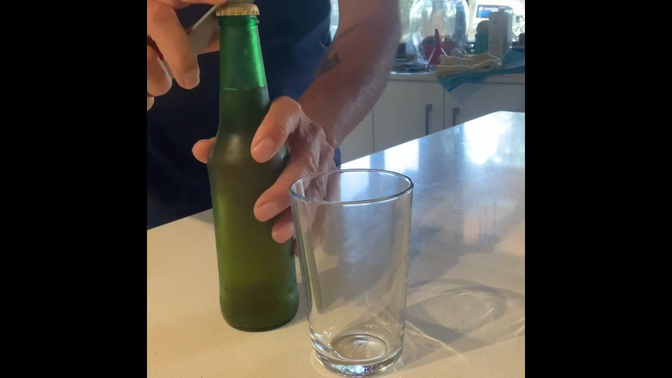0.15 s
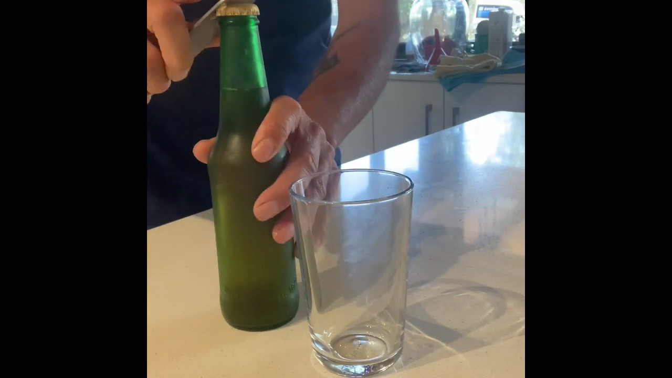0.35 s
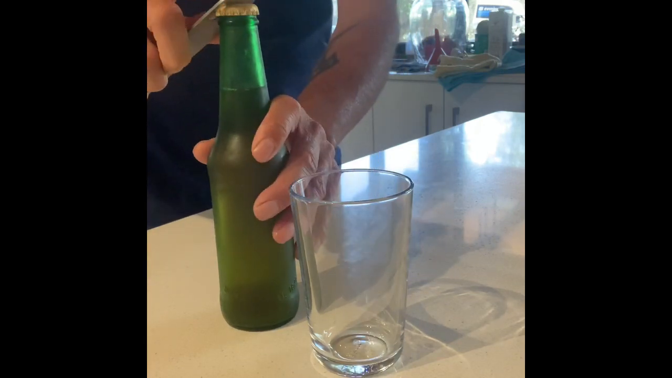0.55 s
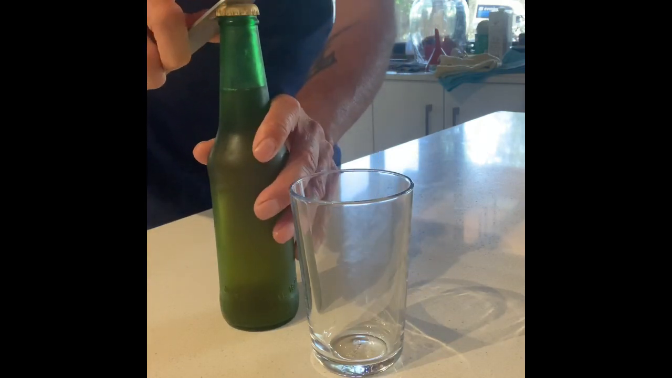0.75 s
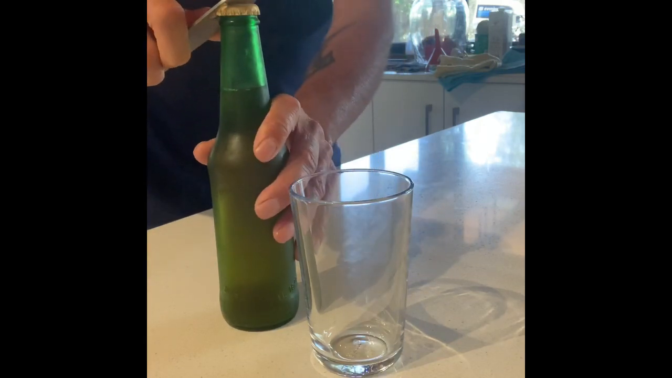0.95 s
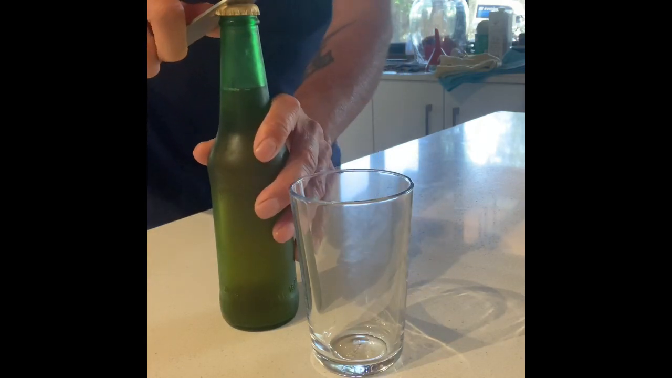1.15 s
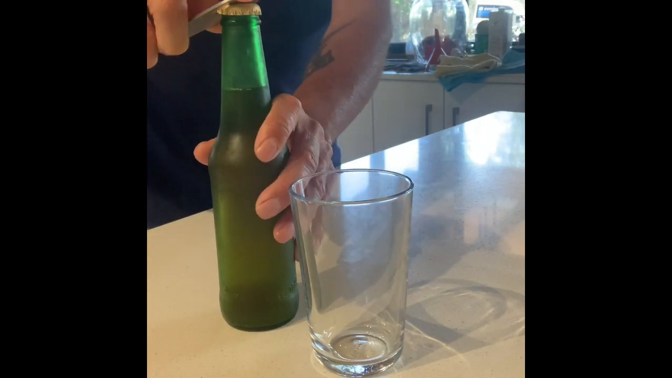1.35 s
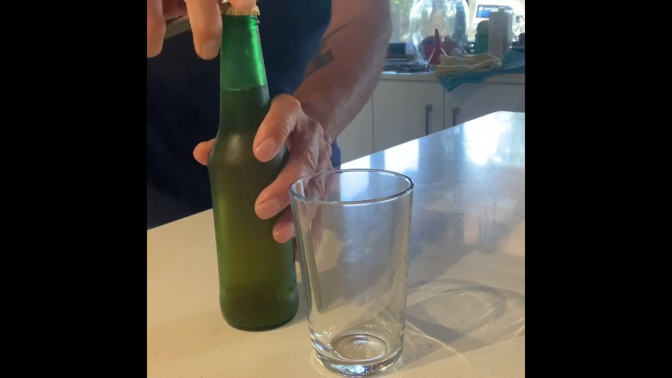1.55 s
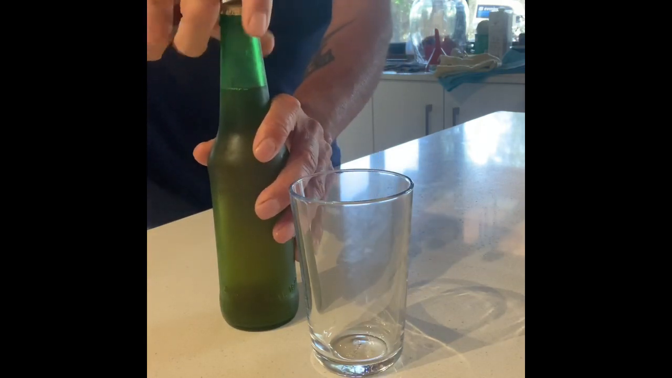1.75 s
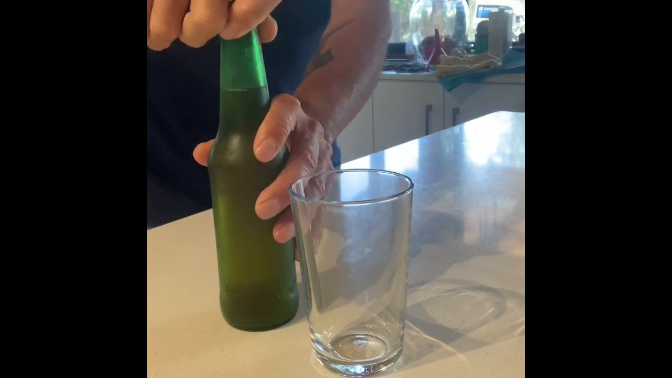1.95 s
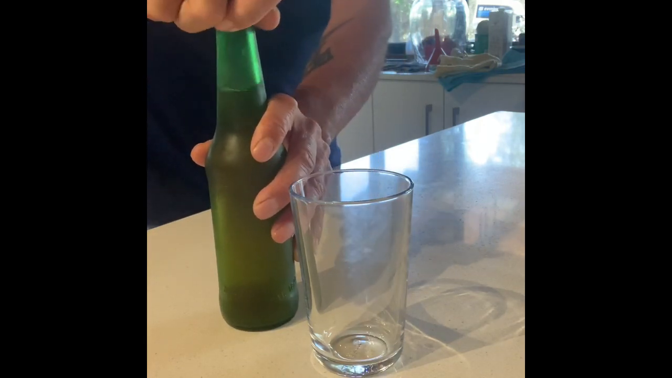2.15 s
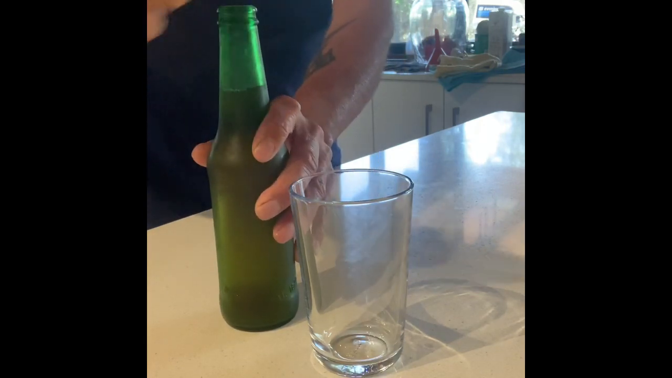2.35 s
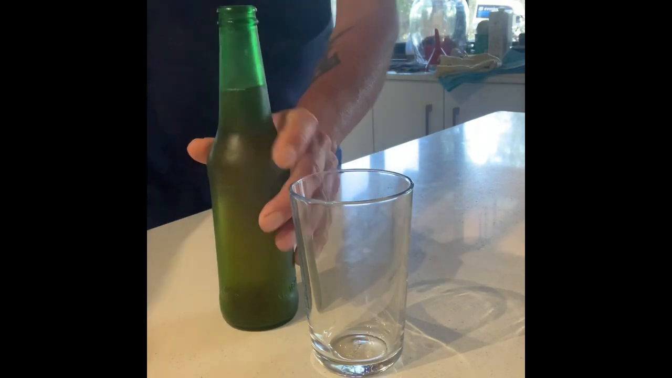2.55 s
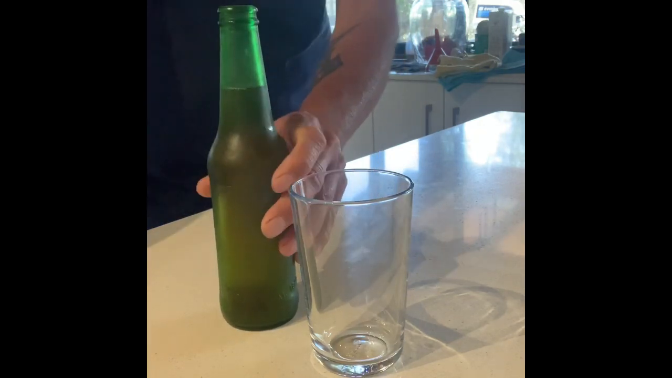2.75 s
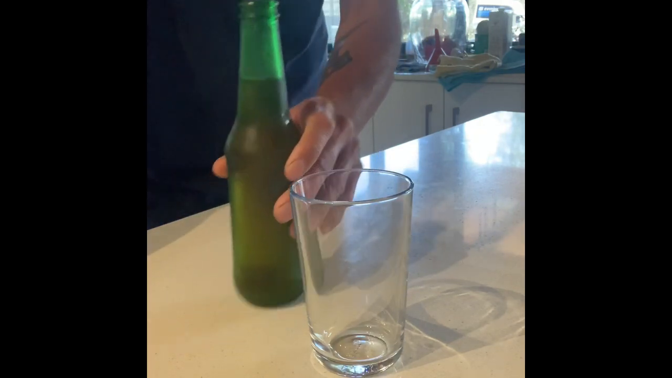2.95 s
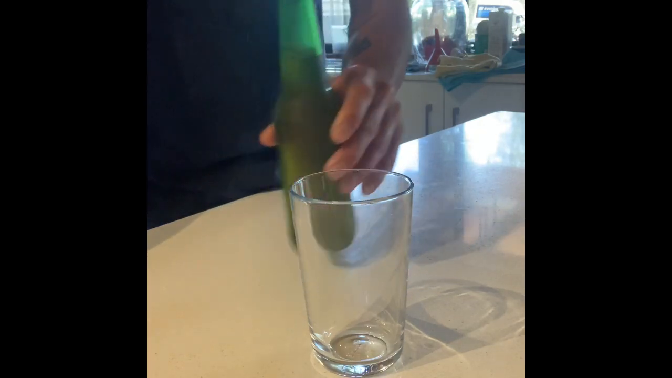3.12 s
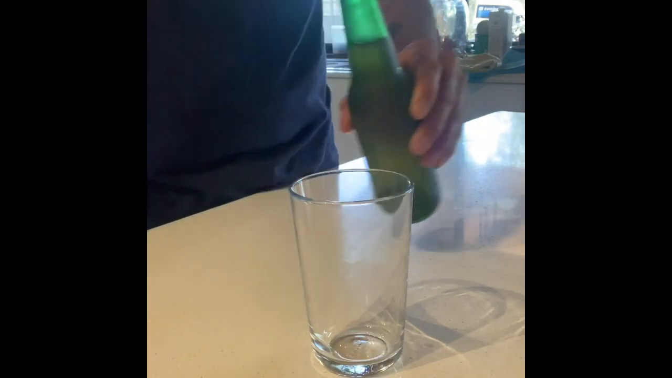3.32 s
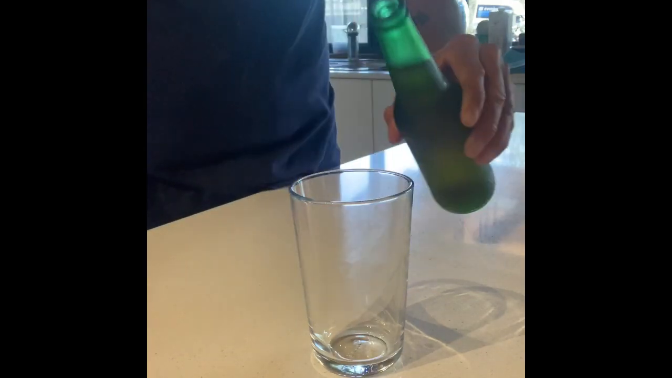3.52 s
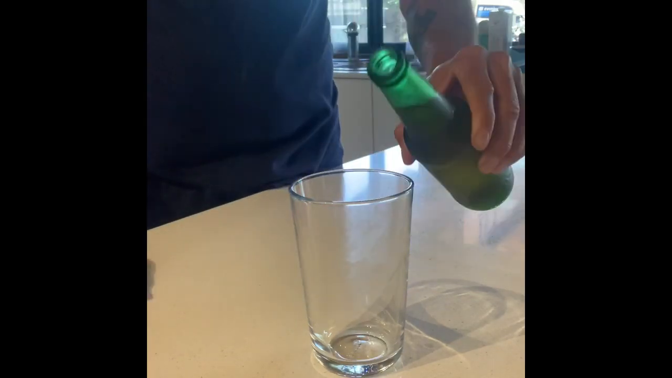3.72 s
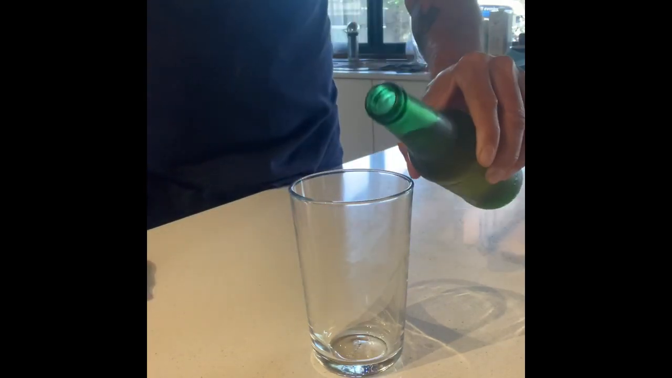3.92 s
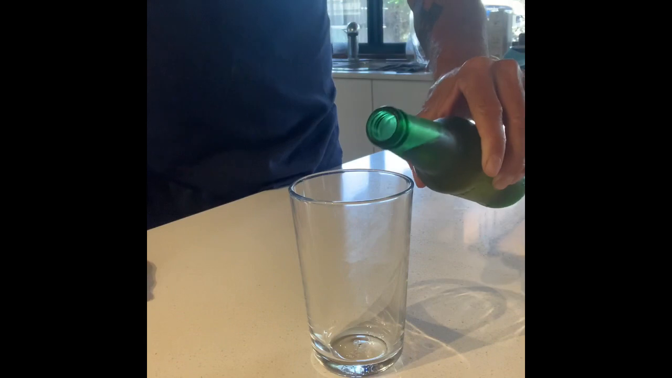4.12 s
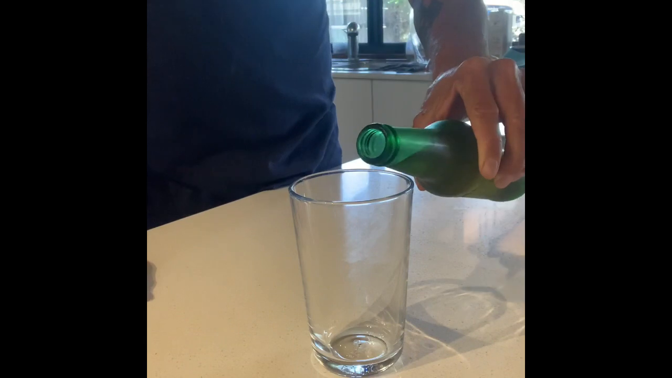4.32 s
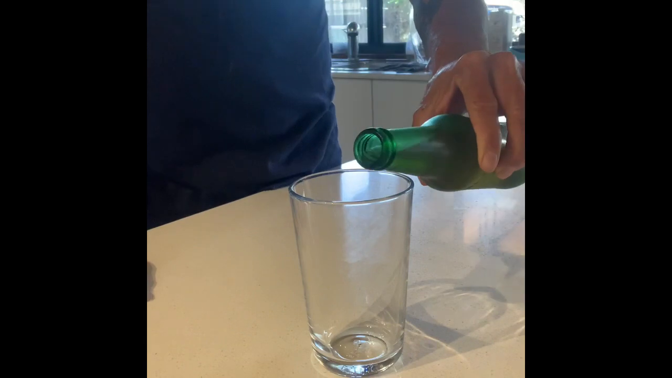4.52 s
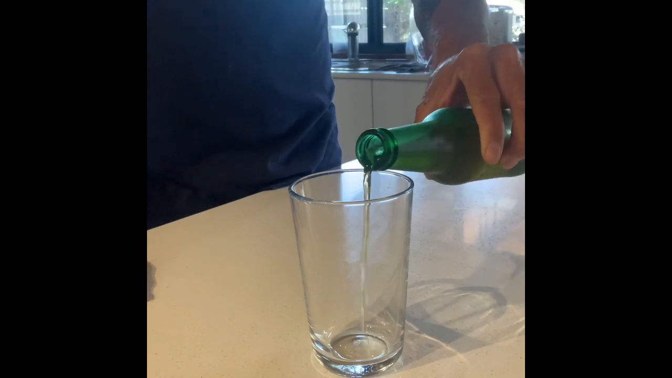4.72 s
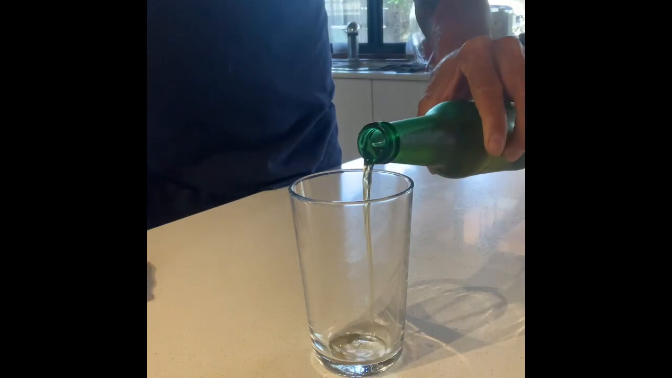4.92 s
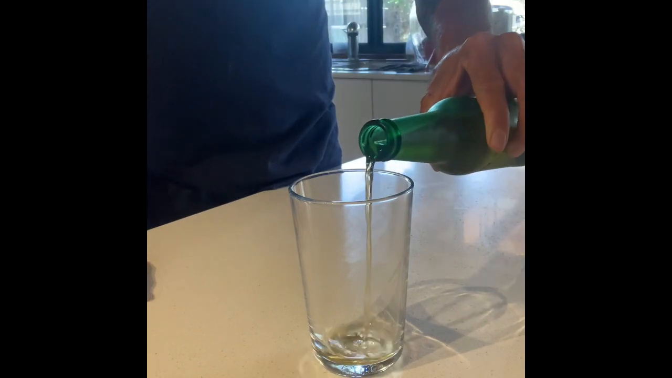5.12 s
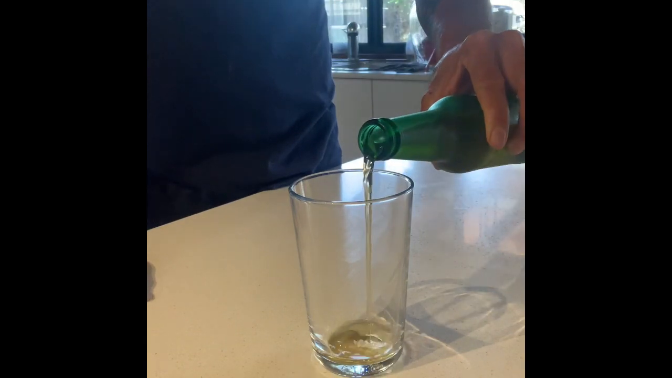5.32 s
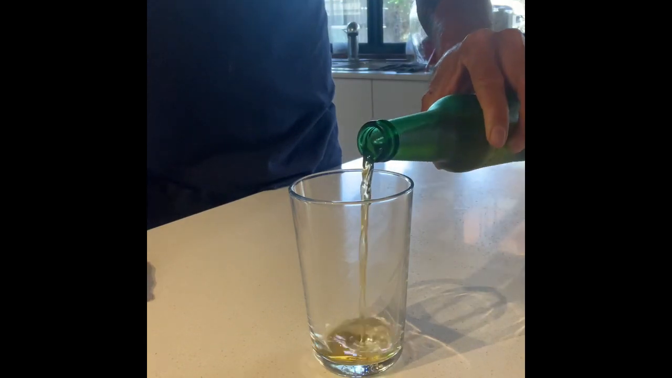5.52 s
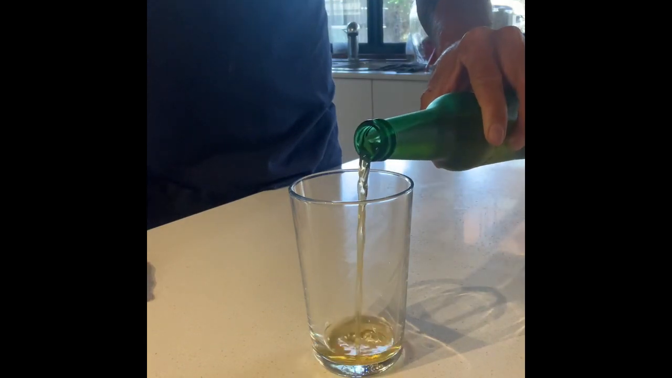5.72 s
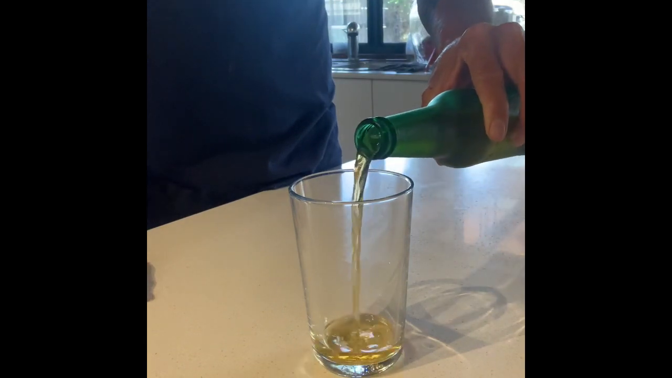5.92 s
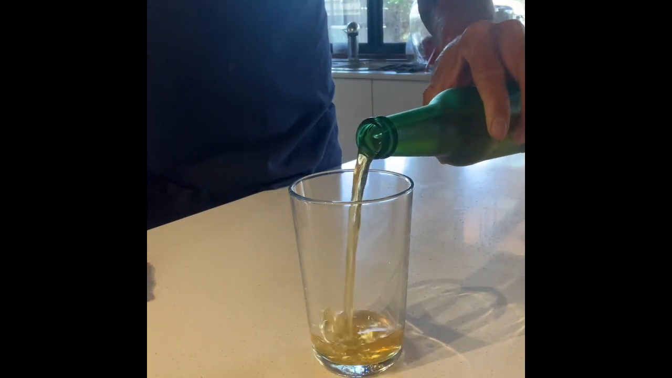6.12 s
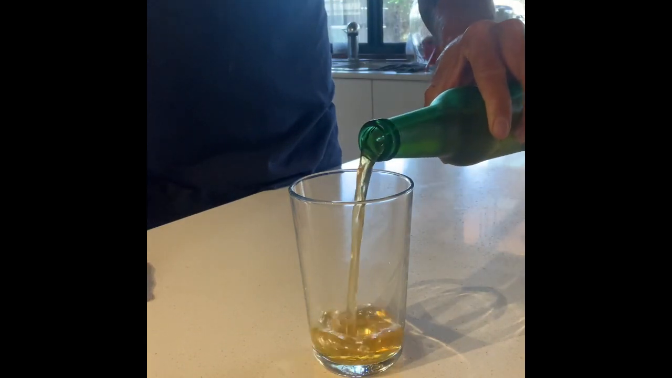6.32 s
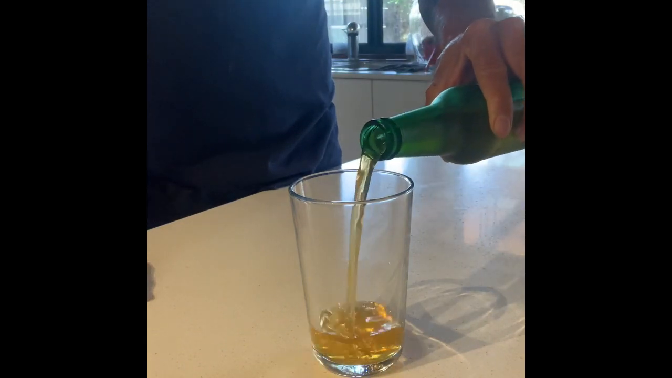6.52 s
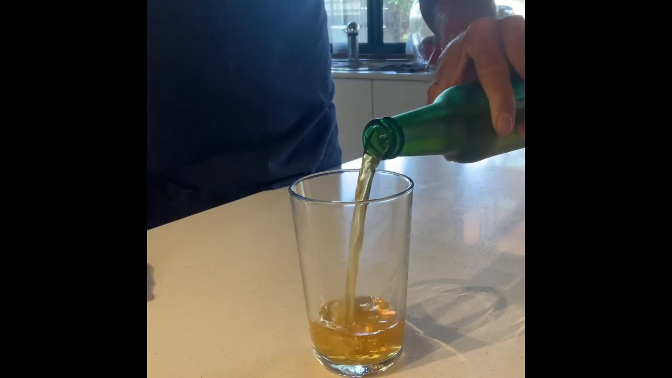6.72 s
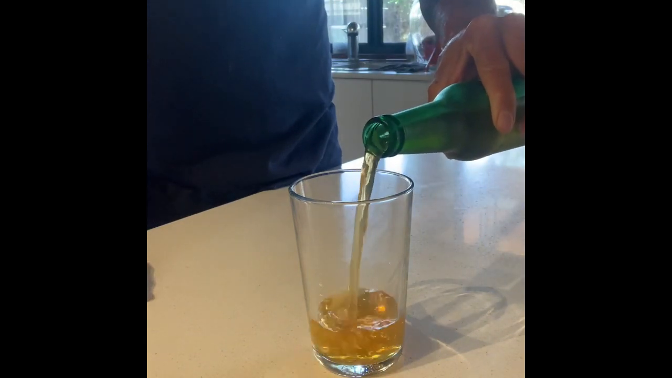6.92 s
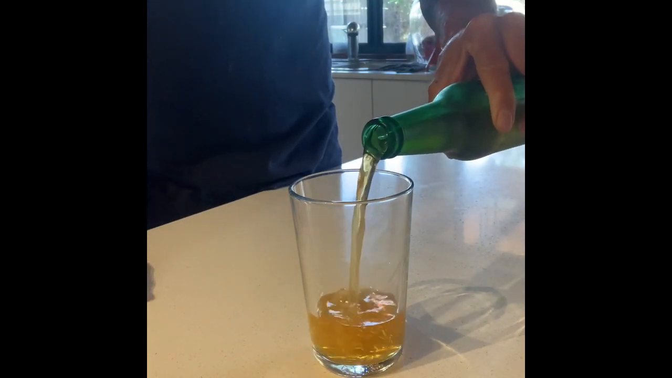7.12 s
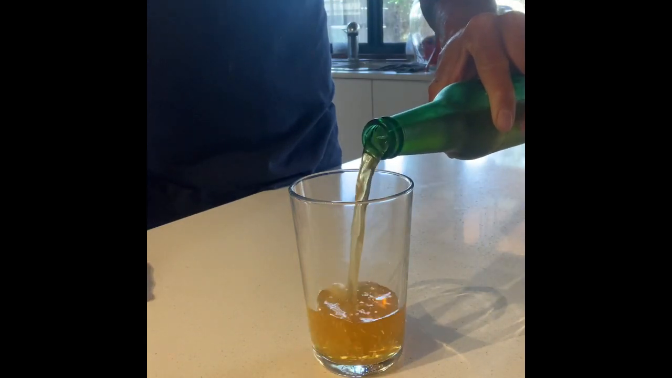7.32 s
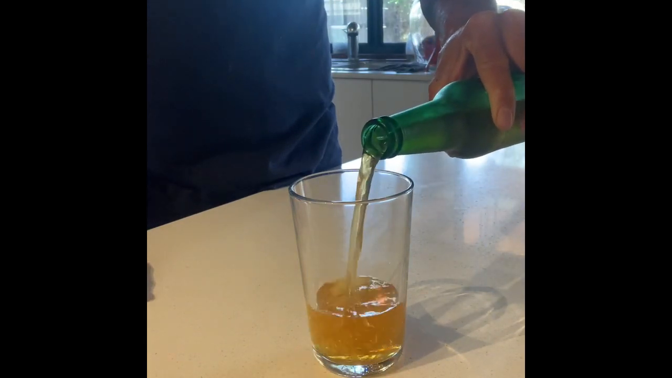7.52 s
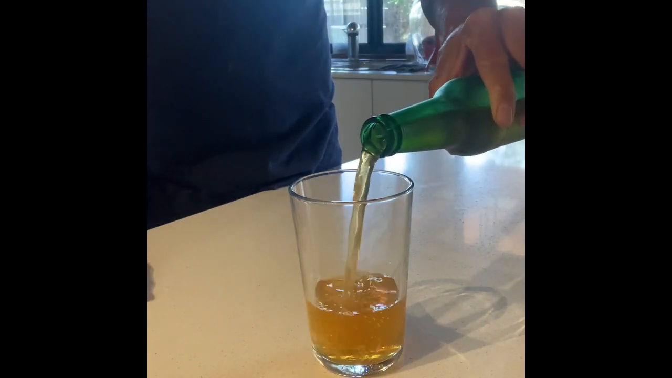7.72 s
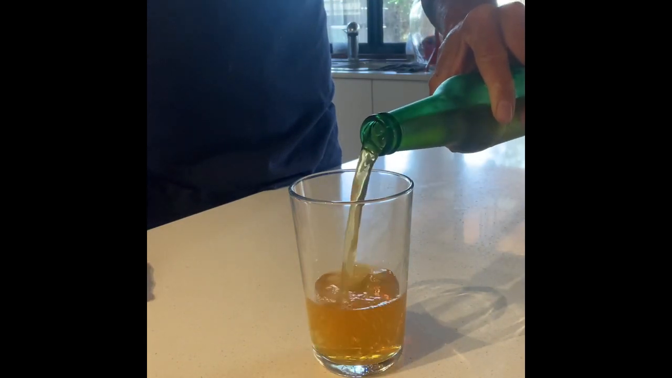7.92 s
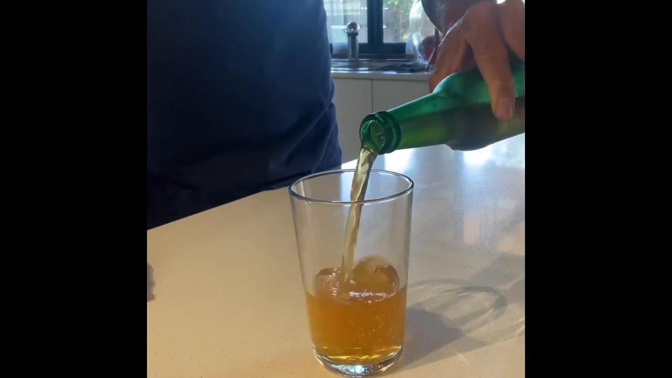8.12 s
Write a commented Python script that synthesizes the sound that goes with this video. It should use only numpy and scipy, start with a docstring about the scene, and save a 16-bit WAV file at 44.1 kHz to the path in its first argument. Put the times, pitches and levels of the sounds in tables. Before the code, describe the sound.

Close stereo pickup at a kitchen counter: a thin hiss with a short spurt, dull wooden knocks and low thuds, a metallic tooth slip, then a crisp cap snap. Ringing steel hits the worktop and rattles to rest. After a quiet gap come two small glass clinks and a much softer pour of plopping, fizzing bubbles, over faint room air and low hum.

```python
"""Opening a bottle and pouring a drink

Gas leaks and spurts from under a crown cap; the bottle knocks and judders on a kitchen counter as the opener slips,
the cap snaps off, and the steel opener drops and bounces. The neck clinks on a tumbler and a thin stream bubbles in.
Struck solids are damped modes with a noise crack, the counter adds dispersive bending waves, gas is shaped noise,
and the drink is many ringing bubbles. A fairly live room, a faint hum and a swelling low tone surround two ports.
"""
import sys
import numpy as np
from scipy import signal
from scipy.fft import rfft, irfft, next_fast_len
from scipy.io import wavfile

SR = 44100
rng = np.random.default_rng(int(sys.argv[2]) if len(sys.argv) > 2 else 0)


def generate_wav(signal):
    """Clip the signal to [-1, 1] and save it as 16-bit WAV at the path in sys.argv[1]."""
    frames = np.transpose(np.atleast_2d(signal))
    scaled = np.clip(frames, -1, 1) * 32767
    pcm = np.round(scaled).astype(np.int16)
    wavfile.write(sys.argv[1], SR, pcm)


N = 364001

# Levels in event tables are relative; the mix sets the final balance.
# Quiet room air. Each row: frequency in Hz, relative level in dB.
AIR_SPECTRUM = [(25, -28.5), (45, -0.5), (75, -2.5), (150, -7.5), (250, -14.5), (450, -15), (900, -18.5),
                (1800, -24.5), (3500, -32), (7000, -37.5), (14000, -43)]
# Hum of a kitchen appliance. Each row: frequency in Hz, level in dB.
HUM_TONES = [(53.8, -73), (102.3, -68.5)]
# Swells of a low tone near 159 Hz, perhaps the counter or room resounding.
# Each row: time at full strength in s, level in dB, attack, hold, release in s.
LOW_TONE_SWELLS = [(3.298, -55.5, 0.47, 0.022, 0.97), (6.3, -64, 3.5, 0.22, 1.48)]
# Reverberation time of the room. Each row: frequency in Hz, 60 dB decay time in s.
REVERBERATION_TIME = [(100, 0.54), (500, 0.54), (2000, 0.71), (6000, 0.67), (10000, 0.26), (15000, 0.29)]
# Likeness of diffuse sound at the two ports. Each row: frequency in Hz, correlation.
PORT_CORRELATION = [(60, 0.79), (150, 0.76), (400, 0), (2500, 0.029), (6000, 0.35), (9000, 1), (15000, 0)]
# Phase by which the left channel leads. Each row: frequency in Hz, phase in radians.
LEFT_PHASE_LEAD = [(50, 0), (3500, .6), (5000, 1.5), (6500, 2.2), (8300, 2.9), (10000, 3.3), (11400, 4.2),
                   (12600, 5.7), (16000, 6.3)]
# Port balance for all but the background. Each row: frequency in Hz, left minus right in dB.
PORT_LEVEL_DIFFERENCE = [(60, 5), (125, 3.5), (260, 12.5), (500, 3), (1000, 1), (2000, -1.5), (4500, -1),
                         (12000, 3)]

# Gas hiss of the leak. Each row: frequency in Hz, relative level in dB.
LEAK_SPECTRUM = [(400, -24.5), (950, 5.5), (1400, -1), (2100, -3.5), (2600, -1.5), (4500, -9), (8500, -10),
                 (11000, -14.5), (15000, -28)]
# Hiss of spurts and spits. Each row: frequency in Hz, relative level in dB.
JET_SPECTRUM = [(1000, -39), (2500, -18), (4000, -15), (6000, -8), (7600, 0.5), (8900, -55), (10200, 5),
                (11500, 8), (12700, -3), (13600, 1), (15500, -5)]
# Gas spurting as the seal lifts. Each row: time at full strength in s, level in dB, attack, hold, release in s.
GAS_SPURTS = [(0.872, -44.5, .06, 0.029, .02), (0.909, -32, .003, 0.0018, .006),
              (0.917, -35, 0.032, 0.07, 0.024)]
# Bottle base sticking and slipping on the counter.
# Each row: time at full strength in s, level in dB, attack, hold, release in s, judder rate in Hz.
BASE_RUBS = [(2.732, -51.5, .015, 0.0038, 0.019, 605), (2.764, -47, .012, 0.0058, 0.027, 402),
             (2.787, -47, .025, 0.0081, 0.017, 423), (2.804, -40.5, 0.017, 0.0079, 0.026, 385.5),
             (2.824, -48.5, .015, 0.0045, .05, 237.8), (2.863, -57.5, .04, 0.0091, 0.024, 652),
             (3.135, -51.5, .04, .02, 0.023, 363)]
# Hand and cap rustling against the bottle.
# Each row: time at full strength in s, level in dB, attack, hold, release in s, brightness in Hz.
HAND_BRUSHES = [(1.642, -52, 0.13, 0.0039, 0.0099, 1180), (1.658, -62, 0.049, .003, 0.068, 14000),
                (2.842, -56, 0.13, 0.073, 1, 11600), (3.442, -64.5, 0.035, 0.06, 0.21, 14240),
                (4.141, -65, 0.05, 0.0094, 0.17, 2443)]

# Bottle knocking on the counter.
# Each row: start in s, knock level in dB, knock centre in Hz, thud level in dB, thud frequency in Hz.
BOTTLE_KNOCKS = [(.017, -58, 533, -66, 91), (.856, -73, 250, -49, 102), (1.368, -51, 380, -43, 170),
                 (1.393, -79, 298, -57, 175), (1.642, -41.5, 503, -33, 173.5), (1.709, -59, 700, -59, 172),
                 (1.741, -46.5, 426, -34, 160), (1.9244, -46, 650, -24, 84.8),
                 (2.1435, -39.5, 639.5, -55, 88), (2.612, -43.5, 735, -30, 135)]
# Modes of the counter top. Each row: frequency in Hz, level in dB, 60 dB decay time in s.
COUNTER_MODES = [(90, 3.5, 0.86), (156.8, -10, 0.98), (201.9, -3, 0.37), (298, -6.5, 0.08), (393, -2, 0.11),
                 (544, -15, 0.033), (750, -16.5, .08), (806, 6, 0.13), (980, -7, .12), (1356.4, -9, 0.059)]
# Opener landing and bouncing. Each row: start in s, ring level in dB, brightness in Hz, chatter length in s,
# knock level in dB, thud level in dB, thud frequency in Hz.
OPENER_LANDINGS = [(2.9958, -16.5, 14000, 0.0095, -38.5, -27.5, 116),
                   (3.0104, -22, 10000, .006, -52.5, -31.5, 75.6),
                   (3.02, -25.5, 9970, .007, -55.5, -46.5, 150),
                   (3.032, -23.5, 10900, 0.015, -52.5, -41, 83.5), (3.085, -33, 7047, 0.016, -47, -38, 114),
                   (3.1408, -34.5, 12700, 0.005, -50, -41, 136),
                   (3.1517, -27.5, 10120, 0.0066, -54.5, -42, 150),
                   (3.158, -29, 11600, .004, -48.5, -44, 150),
                   (3.2055, -36.5, 11800, .004, -52, -36, 135.2),
                   (3.244, -63, 10000, 0.0068, -57, -44.5, 138.6),
                   (3.281, -69, 9980, 0.0081, -60.5, -36, 148.5)]
# Ring of the steel opener. Each row: frequency in Hz, level in dB, 60 dB decay time in s before shortening.
OPENER_RING_MODES = [(2789, -20, .14), (3811, -16, .05), (4300, -14, .04), (5450, -16, .05),
                     (6258, -15, .13), (6440, -12, .12), (7010, -12, .12), (7430, -3, .12), (7540, -5, .12),
                     (7760, 0, .13), (8700, 2, .1), (8850, -3, .11), (9380, -3, .11), (9520, -3, .11),
                     (10340, -3, .08), (10886, -5, .11), (11670, -4, .12), (11780, -4, .12),
                     (12248, -2, .15), (13790, -4, .12), (14450, -8, .15), (14620, -9, .15),
                     (15260, -9, .12)]
# Crack of the opener's contacts. Each row: frequency in Hz, relative level in dB.
OPENER_CRACK_SPECTRUM = [(500, -12.5), (1200, -20), (1900, -15), (2700, -7), (4300, -3), (6000, -0.5),
                         (8700, 4), (10300, 8), (13000, -5.5), (15500, -5.5)]
# Opener teeth slipping on the rim of the cap. Each row: start in s, level in dB, brightness in Hz.
TOOTH_SLIPS = [(1.9232, -39, 9000), (1.9253, -25, 8980), (1.9285, -60, 7000), (1.9385, -36.5, 5000),
               (1.944, -42, 5000)]
# Loose cap ticking against the opener. Each row: start in s, level in dB, brightness in Hz.
CAP_RATTLES = [(2.812, -54.5, 7000), (2.842, -51.5, 9000), (2.893, -57, 9000)]
# Modes rung by slips and rattles. Each row: frequency in Hz, level in dB, 60 dB decay time in s.
SLIP_RING_MODES = [(1018, -3, 0.03), (2130, 4, 0.022), (2850, -3, 0.025), (3620, 0, .022), (3950, -8, .06),
                   (5080, 2, .02), (5550, 1, .012), (6900, 0, .012), (7800, 0, .025)]
# Crack of slips and rattles. Each row: frequency in Hz, relative level in dB.
SLIP_CRACK_SPECTRUM = [(500, -2.5), (1000, -10), (1500, -14), (2100, -10.5), (3000, -13), (4300, -13),
                       (5100, -13), (6100, -13), (7800, -2.5), (9500, -10), (12000, -15), (15000, -29.5)]
# Cap creaking as it bends, then snapping free. Each row: start in s, level in dB, brightness in Hz.
CAP_SNAPS = [(.841, -48, 14800), (2.612, -12.5, 15050), (2.6127, -18.5, 15000), (2.6186, -33, 14860)]
# Ring of the cap. Each row: frequency in Hz, level in dB, 60 dB decay time in s before shortening.
CAP_RING_MODES = [(3620, -16, .04), (6150, -8, .1), (6390, -3, .1), (7650, -6, .05), (8200, -4, .06),
                  (9870, -2, .09), (12300, -2, .08), (13880, -11, .08), (15400, -7, .06)]
# Crack of the cap. Each row: frequency in Hz, relative level in dB.
CAP_CRACK_SPECTRUM = [(500, -4), (1400, -14), (2100, -19), (3150, -19), (3650, -8), (4200, -12.5),
                      (5600, -10), (6400, 1.5), (8200, 4.5), (9100, -5), (10000, 6.5), (11400, -4),
                      (12400, 2), (14200, -9), (15500, 6)]

# Bottle neck touching the tumbler. Each row: start in s, level in dB, brightness in Hz.
NECK_CLINKS = [(4.3903, -50, 2200), (4.416, -50, 1776), (4.425, -50.5, 1790), (4.5834, -32, 3040),
               (4.5982, -39, 1800)]
# Bottle and tumbler pressed together. Each row: frequency in Hz, level in dB, 60 dB decay time in s.
JOINED_GLASS_MODES = [(230.5, -9.5, 0.12), (388, -3, 0.052), (975, 2.5, 0.04), (1480, 2, 0.02),
                      (1953, -17, 0.043), (2610, -16, 0.025)]
# Crack of glass on glass. Each row: frequency in Hz, relative level in dB.
GLASS_CRACK_SPECTRUM = [(100, -0.5), (350, -10), (1000, 6), (1600, 0), (2500, -9), (5000, -21.5),
                        (15000, -34)]
# The tumbler's free rim. Each row: frequency in Hz, level in dB, 60 dB decay time in s.
TUMBLER_RIM_MODES = [(2326, -10, .12), (3275, 1.5, 0.28), (3400, 0, 0.09), (5150, -0.5, 0.18),
                     (6525, -14, 0.15)]
# Strength of the stream running into the tumbler. Each row: time in s, level in dB.
STREAM_STRENGTH = [(5.3, -95.5), (5.32, -80), (5.49, -86), (5.52, -67), (5.59, -69.5), (5.65, -62.5),
                   (5.84, -86), (5.87, -68.5), (6.069, -69.5), (6.1, -77), (6.13, -66), (6.25, -63),
                   (6.54, -70.5), (7.399, -73), (7.9, -72.5), (7.94, -80), (8.21, -76), (8.25, -93)]
# Resonances of the tumbler's air column. Each row: frequency in Hz, bandwidth in Hz, level in dB.
AIR_COLUMN_MODES = [(2365, 78, -4), (2760, 240, 8.5), (3344, 100, 12), (4260, 230, -3), (5570, 820, -8)]
# Loudest single bubbles. Each row: start in s, level in dB, starting pitch in Hz.
LOUD_BUBBLES = [(5.511, -51.5, 1480), (6.079, -54, 1500), (6.235, -41, 2380), (6.287, -41, 1230),
                (6.31, -42.5, 1120), (6.327, -44.5, 848), (6.353, -45.5, 853), (6.355, -41.5, 1044),
                (6.377, -40, 863), (6.421, -42.5, 2267), (6.526, -51.5, 1490), (6.569, -44.5, 856),
                (6.616, -48, 840), (6.687, -52.5, 1204), (6.727, -52, 740), (6.783, -54, 1180),
                (6.89, -48, 1480), (7.819, -47, 2850)]
# Drops ringing the hollow of the tumbler. Each row: start in s, level in dB, starting pitch in Hz.
HOLLOW_DRIPS = [(5.517, -45, 2117), (5.642, -54, 2070), (5.678, -49.5, 2060), (5.872, -52, 3530),
                (5.95, -61, 3460), (6.092, -47.5, 2117), (6.987, -55, 3390), (7.277, -53, 3327)]
# Splashes that trap clusters of bubbles. Each row: start in s, length in s, level in dB, typical pitch in Hz.
BUBBLE_SPLASHES = [(5.532, 0.044, -56, 3890), (5.862, 0.03, -56.5, 3410), (6.183, 0.065, -51.5, 2970),
                   (6.235, 0.013, -50.5, 2900), (6.41, .06, -58, 2480), (6.649, 0.051, -51.5, 2410),
                   (6.669, .16, -52.5, 1042), (6.765, 0.044, -59, 2360), (6.791, 0.12, -53, 3540),
                   (6.867, 0.068, -63.5, 1500), (7.022, 0.066, -62.5, 900), (7.055, 0.056, -66, 2033),
                   (7.088, 0.056, -59, 3500), (7.171, 0.056, -53, 2310), (7.467, 0.045, -59, 2200),
                   (7.537, 0.098, -60, 4850), (7.599, 0.04, -54.5, 2480), (7.668, 0.078, -54, 3870),
                   (7.729, .07, -64, 5200), (7.811, 0.034, -59, 2920), (7.854, 0.044, -55, 3040)]
# Droplets spattering on the glass wall. Each row: start in s, level in dB, brightness in Hz.
WALL_SPATTER = [(5.512, -60.5, 8000), (5.623, -63, 11870), (6.09, -51, 7120), (6.235, -54.5, 6050),
                (6.312, -54, 8900), (6.326, -49, 8940)]
# Crack of a droplet. Each row: frequency in Hz, relative level in dB.
DROPLET_CRACK_SPECTRUM = [(1000, 4), (2200, 10), (4500, 1), (8500, 4), (14500, -20)]
# Foam spitting at the bottle mouth. Each row: time at full strength in s, level in dB, attack, hold, release in s.
FOAM_SPITS = [(4.71, -75, 0.0079, 0.017, 0.1), (5.526, -58, 0.0042, 0.0024, 0.023),
              (5.542, -70, 0.022, 0.0089, 0.13), (6.113, -55.5, 0.0022, 0.0027, 0.017)]

TIME = np.arange(N) / SR
SIZE = next_fast_len(N + SR, real=True)
FREQ = np.arange(SIZE // 2 + 1) * SR / SIZE
RING = TIME[:SR // 2]
ATTACK = SR // 250  # 4 ms in samples
TOP_HZ = 15800
LOW_TONE_HZ, LOW_TONE_DB = 158.6, -84  # the low tone between its swells
HUM_LAG, POUR_LAG = 7, 8  # samples by which the left port is later

# The leak's hiss stays at full strength during the hold, past the snap of the cap.
LEAK_FULL_S, LEAK_ATTACK_S, LEAK_HOLD_S, LEAK_RELEASE_S, LEAK_HISS_DB = 0.73, 0.68, 2.7, .1, -65
# The neck's tone swells and fades around its loudest moment and sinks as the pressure falls.
NECK_PEAK_S, NECK_DB, NECK_FADE_DB_PER_S2 = 1.55, -62, 10.5
NECK_HZ, NECK_SAG_HZ_PER_S = 1598, 100  # pitch at the loudest moment, and its fall
RUB_JITTER = .2  # share by which the judder rate wanders (rms)
LANDING_KNOCK_HZ = 501.7  # the counter's answer to the opener
CHATTER_FALL_DB = 5  # over the length of a landing's chatter
CHATTER_SCATTER_DB = 2  # either way, from one contact to the next

RIM_DB, RIM_ROOM_DB = -15, -13  # rim relative to its contact; its share of room
DRINK_ROOM_DB = -3.5  # the stream's share of room
# Small bubbles rise in typical pitch once a head builds on the drink; foam grows throughout.
HEAD_S, BUBBLE_HZ, BUBBLE_RISE_OCT_PER_S = 6.7, 2200, 0.667
FOAM_DB, FOAM_RISE_DB_PER_S = -5, 3  # relative to the stream, at HEAD_S
BUBBLE_GLIDE = .03  # share by which a bubble's pitch rises while it rings
DRIP_CYCLES = 130
# The stream plunges into the pool and gurgles, dying away.
GURGLE_START_S, GURGLE_LENGTH_S, GURGLE_DB, GURGLE_FADE_DB_PER_S, GURGLE_HZ = 6.28, 1.1, -61, 8, 1145
POOL_HZ, POOL_WIDTH_HZ, POOL_DB = 880, 65, 2  # the hollow above the pool, rung by the gurgle


def undb(db):
    """An amplitude ratio is ten to the power of decibels over twenty."""
    return np.exp(np.asarray(db) * (np.log(10) / 20))


def unit(x):
    """Scaling to rms 1 gives signals equal mean power."""
    return x / np.sqrt(np.mean(x ** 2))


def unit_attack(x):
    """A blow is scaled to rms 1 over its first 4 ms."""
    return x / np.sqrt(np.mean(x[:ATTACK] ** 2))


def over_hz(points, hz):
    """A spectrum is read between (Hz, value) points on a logarithmic frequency axis."""
    f, value = np.transpose(points)
    return np.interp(np.log(hz + 1e-9), np.log(f), value)


def curve(table):
    """A gain curve is interpolated in dB between (s, dB) rows, and silent outside them."""
    s, db = np.transpose(table)
    return undb(np.interp(TIME, s, db)) * (TIME >= s[0]) * (TIME <= s[-1])


def noise(points, size=N):
    """White noise filtered to a (Hz, dB) spectrum models turbulence, here with rms 1."""
    n = next_fast_len(size, real=True)
    gain = undb(over_hz(points, np.fft.rfftfreq(n, 1 / SR)))
    return unit(irfft(rfft(rng.standard_normal(n)) * gain, n)[:size])


def slow_noise(hz):
    """Low-passed noise gives a random wander of rms 1, up to about hz changes a second."""
    low_pass = signal.butter(2, hz, fs=SR, output="sos")
    return unit(signal.sosfilt(low_pass, rng.standard_normal(N)))


def fade(t60):
    """Damping proportional to velocity makes an exponential decay, 60 dB in t60 seconds."""
    return np.exp(-np.log(1000) * RING / t60)


def swell(s, db, attack_s, hold_s, release_s):
    """A gain linear in dB reaches db at time s, holds and falls; attack and release each span 30 dB."""
    away = np.maximum((s - TIME) / attack_s, 0) + np.maximum((TIME - s - hold_s) / release_s, 0)
    return undb(db - 30 * np.minimum(away, 5))


def dull(x, hz):
    """A one-pole low-pass gently removes treble."""
    return signal.lfilter([1], [1, -np.exp(-2 * np.pi * hz / SR)], x)


def ring(modes, scatter_db=0, stretch=1, detune=.003):
    """A struck body rings in damped modes, whose strengths and exact pitches vary at random with each blow."""
    out = 0
    chance = rng.standard_normal((len(modes), 2))
    for (size, shift), (hz, db, t60) in zip(chance, modes):
        tone = np.sin(2 * np.pi * hz * (1 + detune * shift) * RING)
        out = out + undb(db + scatter_db * size) * tone * fade(t60 * stretch)
    return out


def add(track, s, sound):
    """Sounds superpose linearly from their starting times."""
    i = max(int(s * SR), 0)
    track[i:i + len(sound)] += sound[:max(N - i, 0)]


def strikes(table, modes, crack_spectrum, crack_t60, ring_db, stretch=1, scatter_db=2, rise_s=0.0014):
    """A hard contact makes a short crack and a modal ring; a softer contact excites less treble."""
    out = np.zeros(N)
    for s, db, bright_hz in table:
        crack = unit_attack(noise(crack_spectrum, size=len(RING)) * fade(crack_t60))
        blow = crack + undb(ring_db) * unit_attack(ring(modes, scatter_db, stretch))
        softened = dull(blow * (1 - fade(rise_s)), bright_hz)
        add(out, s, undb(db) * unit_attack(softened))
    return out


def bubble(hz, cycles, glide):
    """A trapped bubble is a damped oscillator whose pitch rises as it nears the surface."""
    age = np.arange(int(cycles * SR / hz)) / (cycles * SR / hz)  # 0 to 1 over its life
    tone = np.sin(2 * np.pi * cycles * (age + glide * age ** 2 / 2))
    return tone * np.exp(-np.log(1000) * age) * (1 - np.exp(-age * cycles))


def place(x, pan_db=0, lag=0):
    """Level and time differences locate a source: louder on the left by pan_db, later there by lag samples."""
    return np.array([undb(pan_db / 2) * np.pad(x, (lag, 0))[:N], undb(-pan_db / 2) * x])


def diffuse(a, b):
    """Two unrelated signals, mixed as sum and difference, give a diffuse field of set correlation."""
    n = next_fast_len(len(a), real=True)
    likeness = np.clip(over_hz(PORT_CORRELATION, np.fft.rfftfreq(n, 1 / SR)), -.99, .99)
    mid = irfft(rfft(a, n) * np.sqrt((1 + likeness) / 2), n)
    side = irfft(rfft(b, n) * np.sqrt((1 - likeness) / 2), n)
    return np.array([mid + side, mid - side])[:, :len(a)]


def background():
    """Room air is broadband and diffuse; an appliance hum and a swelling low tone waver in phase and level."""
    tones = 0
    for hz, db in HUM_TONES:
        tones = tones + undb(db) * unit(np.sin(2 * np.pi * hz * TIME + 0.56 * slow_noise(hz=0.64)))
    low_tone_gain = undb(LOW_TONE_DB) + sum(swell(*rise) for rise in LOW_TONE_SWELLS)
    low_tone_phase = 2 * np.pi * LOW_TONE_HZ * TIME + 0.31 * slow_noise(hz=2.8)
    tones = tones + low_tone_gain * unit(np.sin(low_tone_phase))
    air = undb(-63.5 + 0.12 * slow_noise(hz=2.7)) * diffuse(noise(AIR_SPECTRUM), noise(AIR_SPECTRUM))
    return air + place(tones * undb(2 * slow_noise(hz=7.3)), lag=HUM_LAG)


def kitchen(x, build_s=0.0043, early_db=4, early_t60=0.13):
    """Reverberation joins strong early reflections from counter and cupboards to a tail that dulls."""
    t = TIME[:SR]
    f = np.fft.rfftfreq(SR, 1 / SR)
    field = rfft(diffuse(*rng.standard_normal((2, SR))))
    tail = 0
    for k, (_, t60) in enumerate(REVERBERATION_TIME):
        # overlapping bands, each with its own decay
        share = over_hz([(hz, float(j == k)) for j, (hz, _) in enumerate(REVERBERATION_TIME)], f)
        tail = tail + irfft(field * share, SR) * np.exp(-np.log(1000) * t / t60)
    build = 1 - np.exp(-(t / build_s) ** 2)
    early = 1 + undb(early_db) * np.exp(-np.log(1000) * t / early_t60)
    return signal.fftconvolve(x[None], unit(tail * build * early) / np.sqrt(SR), axes=1)[:, :N]


def handling(overtone_db=-13):
    """Stick-slip friction makes the bottle base judder with an unsteady period; brushing skin makes noise."""
    judder = 0
    for *shape, hz in BASE_RUBS:
        phase = 2 * np.pi * np.cumsum(hz * (1 + RUB_JITTER * slow_noise(hz=211))) / SR
        judder = judder + swell(*shape) * unit(np.sin(phase) + undb(overtone_db) * np.sin(2 * phase))
    skin = noise([(1500, 0.0), (4000, -4.5), (9000, 2.5), (15000, -3.0)])
    brushes = sum(swell(*shape) * unit(dull(skin, bright_hz)) for *shape, bright_hz in HAND_BRUSHES)
    return judder, brushes


def gas():
    """Escaping gas excites a neck resonance that sinks in pitch; turbulent jets spurt when the seal lifts."""
    opening = swell(LEAK_FULL_S, 0, LEAK_ATTACK_S, LEAK_HOLD_S, LEAK_RELEASE_S)
    since = TIME - NECK_PEAK_S
    phase = 2 * np.pi * np.cumsum(NECK_HZ - NECK_SAG_HZ_PER_S * since) / SR
    # two slow noises in quadrature make a narrow band around the neck's pitch
    neck = unit(slow_noise(hz=115) * np.cos(phase) + slow_noise(hz=117.1) * np.sin(phase))
    tone = np.sqrt(opening) * undb(NECK_DB - NECK_FADE_DB_PER_S2 * since ** 2) * neck
    hiss = opening * undb(LEAK_HISS_DB) * noise(LEAK_SPECTRUM)
    spurts = sum(swell(*spurt) for spurt in GAS_SPURTS)
    jet = spurts * noise(JET_SPECTRUM) * undb(0.78 * slow_noise(hz=150))
    return undb(-4.5) * (tone + hiss), jet


def counter_blows():
    """Bottle and opener excite the same counter, so their blows share the columns of BOTTLE_KNOCKS."""
    landings = [(s, knock_db, LANDING_KNOCK_HZ, thud_db, thud_hz)
                for s, _, _, _, knock_db, thud_db, thud_hz in OPENER_LANDINGS]
    return list(BOTTLE_KNOCKS) + landings


def thuds(cycles=18, rise_s=0.025, upper_db=-6):
    """The whole worktop flexes for some cycles under each blow, with a weaker second mode above the first."""
    out = np.zeros(N)
    for s, _, _, db, hz in counter_blows():
        phase = 2 * np.pi * hz * RING
        flexing = np.sin(phase) + undb(upper_db) * np.sin(1.62 * phase)
        add(out, s, undb(db + 2.0) * flexing * fade(cycles / hz) * (1 - fade(rise_s)))
    return out


def knocks(spread_s=0.019, ring_db=-7, treble_reach=2.9):
    """Bending waves in the slab are dispersive: highs travel faster, so each knock chirps quickly downward."""
    out = np.zeros(N)
    f = np.fft.rfftfreq(len(RING), 1 / SR)
    # travel time falls with the root of frequency; spread_s is its value at 100 Hz
    chirp = irfft(np.exp(-4j * np.pi * spread_s * np.sqrt(100 * f)), len(RING))
    chirp = chirp[int(spread_s * SR / 6):]  # leave out part of the travel time
    for s, db, hz, _, _ in counter_blows():
        contact = signal.butter(1, [hz / 2.9, hz * 1.3], "band", fs=SR, output="sos")
        soft = signal.butter(2, hz * treble_reach, fs=SR, output="sos")
        wave = signal.sosfilt(soft, signal.sosfilt(contact, chirp))
        add(out, s, undb(db) * wave / np.sqrt(np.sum(wave ** 2) / (2 * ATTACK)))
        slab = signal.sosfilt(contact, ring(COUNTER_MODES, scatter_db=2.0))
        add(out, s, undb(db + ring_db) * unit_attack(slab))
    return out


def slips_and_rattles():
    """Brief tooth slips and cap ticks excite light metal modes with a very short rise."""
    return strikes(list(TOOTH_SLIPS) + list(CAP_RATTLES), SLIP_RING_MODES, SLIP_CRACK_SPECTRUM,
                   crack_t60=0.018, ring_db=-3.5, rise_s=.0003)


def cap_snaps():
    """A bending cap snaps free in short cracks with heavily damped high modes."""
    return strikes(CAP_SNAPS, CAP_RING_MODES, CAP_CRACK_SPECTRUM,
                   crack_t60=0.0054, ring_db=-15, stretch=0.33, rise_s=0.005)


def chatter(count=4):
    """A landing bar makes a few quick, uneven, on average weakening contacts: (s, dB, brightness Hz)."""
    contacts = []
    for s, db, bright_hz, length_s, _, _, _ in OPENER_LANDINGS:
        for k, (slip, size) in enumerate(rng.uniform(-1, 1, (count, 2))):
            along = (k + slip / 2) / count if k else 0
            level_db = db - CHATTER_FALL_DB * along + CHATTER_SCATTER_DB * size
            contacts.append((s + along * length_s, level_db, bright_hz))
    return contacts


def opener_drop():
    """A dropped steel opener rings in dense high modes at every contact of its chatter."""
    return undb(1.5) * strikes(chatter(), OPENER_RING_MODES, OPENER_CRACK_SPECTRUM,
                               crack_t60=0.012, ring_db=-5.5, stretch=0.66, scatter_db=4.5, rise_s=0.0025)


def clinks():
    """Glass pressed on glass is strongly damped, so each clink is brief and low."""
    return strikes(NECK_CLINKS, JOINED_GLASS_MODES, GLASS_CRACK_SPECTRUM,
                   crack_t60=0.039, ring_db=0.0, rise_s=0.01)


def rim():
    """A tumbler's free rim rings on in its own modes after each clink."""
    out = np.zeros(N)
    for s, db, _ in NECK_CLINKS:
        add(out, s, undb(db + RIM_DB) * unit_attack(ring(TUMBLER_RIM_MODES, scatter_db=0.5, detune=0)))
    return out


def foam(rate=150, size_db=6, flicker_db=3.5, drift=.015):
    """Bursting bubbles ring the tumbler's air, whose resonances flicker and drift as the surface heaves."""
    sizes = undb(size_db * np.minimum(rng.standard_normal(N), 2))
    pops = (rng.random(N) < rate / SR) * rng.choice([-1, 1], N) * sizes  # rate in bursts per second
    air = 0
    for hz, width, db in AIR_COLUMN_MODES:
        resonance = signal.lfilter(*signal.iirpeak(hz, hz / width, fs=SR), pops)
        air = air + undb(db + flicker_db * slow_noise(hz=10)) * resonance
    # an uneven time axis bends all pitches together
    air = np.interp(np.cumsum(1 + drift * slow_noise(hz=4)) / SR, TIME, air)
    surges = undb(FOAM_DB + FOAM_RISE_DB_PER_S * (TIME - HEAD_S) + 5.3 * slow_noise(hz=23.0))
    return surges * unit(signal.sosfilt(signal.butter(2, 7000, fs=SR, output="sos"), air))


def gurgle(count=260, spread=0.285, size_db=2):
    """Large bubbles from the plunging stream weaken with time and ring the resonant hollow above the pool."""
    out = np.zeros(N)
    for when, (pitch, size) in zip(rng.random(count), rng.standard_normal((count, 2))):
        age = GURGLE_LENGTH_S * when
        db = GURGLE_DB - GURGLE_FADE_DB_PER_S * age + size_db * min(size, 1)
        sound = bubble(GURGLE_HZ * np.exp(spread * pitch), cycles=21, glide=BUBBLE_GLIDE)
        add(out, GURGLE_START_S + age, undb(db) * sound)
    hollow = signal.lfilter(*signal.iirpeak(POOL_HZ, POOL_HZ / POOL_WIDTH_HZ, fs=SR), out)
    return out + undb(POOL_DB) * hollow


def plops(cycles=27, count=14, spread=0.148, size_db=3):
    """Single large bubbles plop, drops ring longer, and each splash frees a quick cluster of smaller bubbles."""
    out = np.zeros(N)
    for s, db, hz in LOUD_BUBBLES:
        add(out, s, undb(db + 4.5) * bubble(hz, cycles, BUBBLE_GLIDE))
    for s, db, hz in HOLLOW_DRIPS:
        add(out, s, undb(db) * bubble(hz, DRIP_CYCLES, BUBBLE_GLIDE))
    for s, length_s, db, hz in BUBBLE_SPLASHES:
        for when, (pitch, size) in zip(rng.random(count), rng.standard_normal((count, 2))):
            sound = bubble(hz * np.exp(spread * pitch), cycles=48, glide=BUBBLE_GLIDE)
            add(out, s + when * length_s, undb(db - 3.0 + size_db * min(size, 1)) * sound)
    return out


def pour(count=450, spread=0.372, size_db=5.0):
    """A stream entrains many small bubbles in step with its strength; foam spits, and drops tick on the wall."""
    small = np.zeros(N)
    stream = curve(STREAM_STRENGTH)
    starts = rng.uniform(STREAM_STRENGTH[0][0], TIME[-1], count)
    for s, (pitch, size) in zip(starts, rng.standard_normal((count, 2))):
        typical_hz = BUBBLE_HZ * 2 ** (BUBBLE_RISE_OCT_PER_S * max(s - HEAD_S, 0))
        hz = min(typical_hz * np.exp(spread * pitch), SR / 3)
        add(small, s, undb(size_db * min(size, 2)) * bubble(hz, cycles=84, glide=BUBBLE_GLIDE))
    small = small / np.std(small[stream > 0])
    drops = strikes(WALL_SPATTER, TUMBLER_RIM_MODES, DROPLET_CRACK_SPECTRUM, crack_t60=0.012, ring_db=-18)
    spits = sum(swell(*spit) for spit in FOAM_SPITS) * noise(JET_SPECTRUM)
    return stream * (undb(-4.0) * small + foam()) + gurgle() + spits + undb(-3.0) * drops


def scene():
    """Direct and reverberant sound superpose at the two microphone ports, each source with its share of room."""
    leak, jet = gas()
    judder, brushes = handling()
    # each row: direct sound at both ports, room level in dB
    sources = [
        (place(judder, pan_db=1.5), -6.5),
        (place(brushes, pan_db=-2.0), -2),
        (place(leak), 5.5),
        (place(jet), -4.5),
        (place(thuds()), -8.5),
        (place(knocks(), pan_db=6.0), 2),
        (place(slips_and_rattles()), -2.5),
        (place(cap_snaps()), -3),
        (place(opener_drop()), -4.5),
        (place(clinks(), pan_db=9.0), -3.0),
        (place(rim()), RIM_ROOM_DB),
        (place(plops(), pan_db=-4.5, lag=POUR_LAG), -0.5),
    ]
    drink = pour()
    room_feed = sum(x.mean(axis=0) * undb(room_db) for x, room_db in sources) + undb(DRINK_ROOM_DB) * drink
    direct = sum(x for x, _ in sources) + place(drink, pan_db=-4.0, lag=POUR_LAG)
    near = direct + kitchen(room_feed)
    balance = undb(np.outer([.5, -.5], over_hz(PORT_LEVEL_DIFFERENCE, FREQ)))
    return irfft(rfft(near, SIZE) * balance, SIZE)[:, :N] + background()


def record(dry):
    """The right channel lags in phase, from nothing in the bass to a full turn in the top treble; ends are cut."""
    lag = np.exp(-1j * over_hz(LEFT_PHASE_LEAD, FREQ))
    right = irfft(rfft(dry[1], SIZE) * lag, SIZE)[:N]
    bass_cut = signal.butter(3, 48, "high", fs=SR, output="sos")
    top_cut = signal.ellip(10, .2, 70, TOP_HZ, fs=SR, output="sos")
    return signal.sosfilt(top_cut, signal.sosfilt(bass_cut, np.array([dry[0], right])))


dry = scene()
out = record(dry)
generate_wav(out)
```